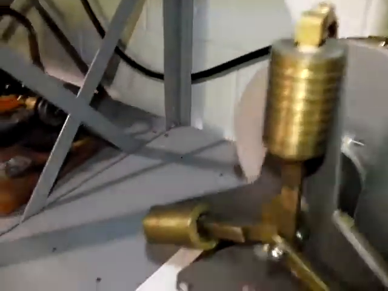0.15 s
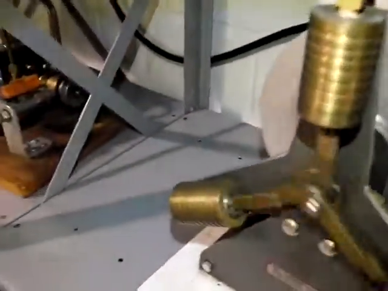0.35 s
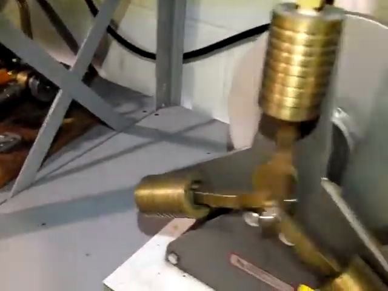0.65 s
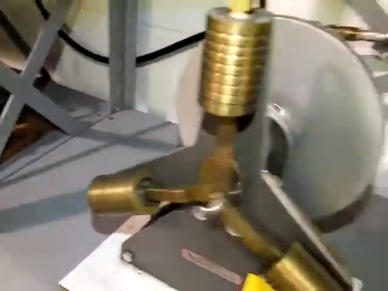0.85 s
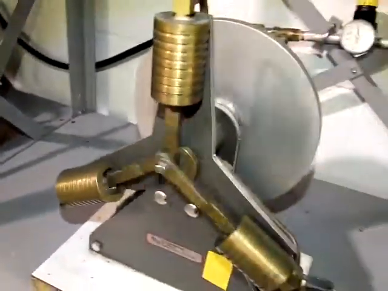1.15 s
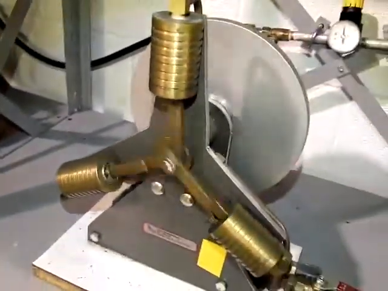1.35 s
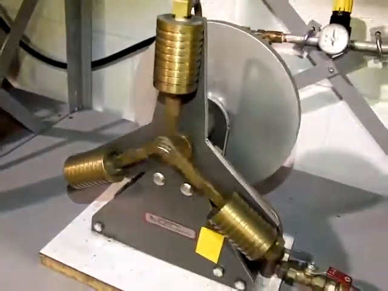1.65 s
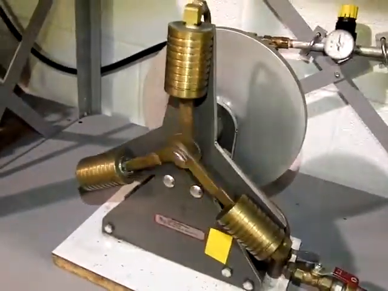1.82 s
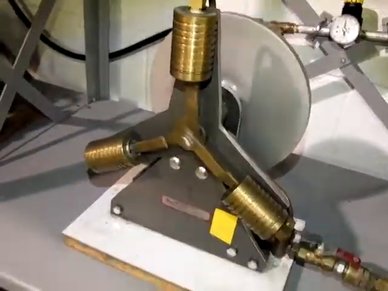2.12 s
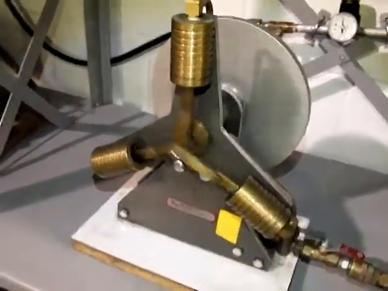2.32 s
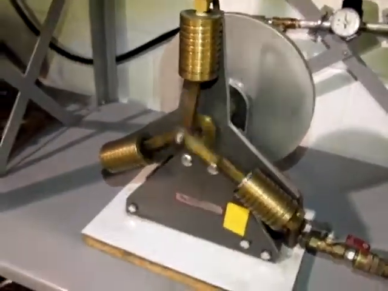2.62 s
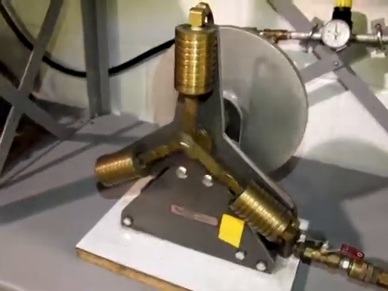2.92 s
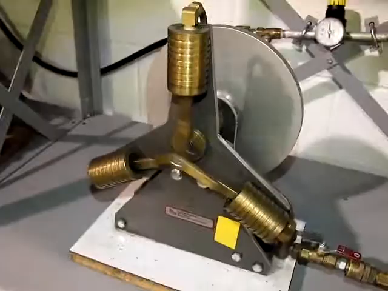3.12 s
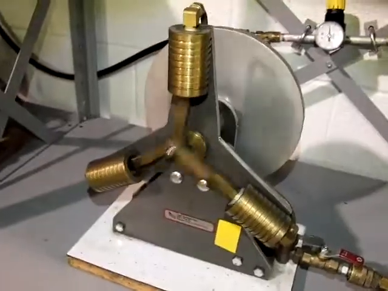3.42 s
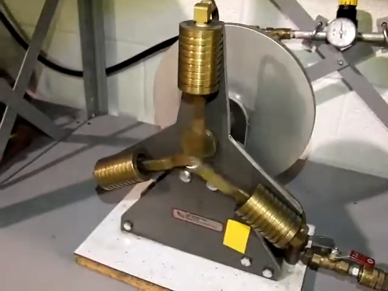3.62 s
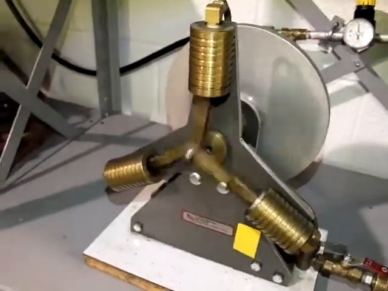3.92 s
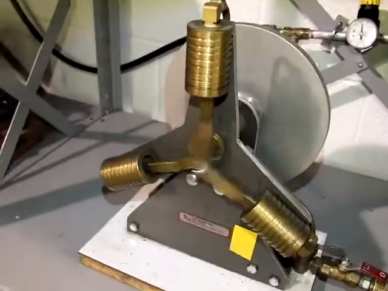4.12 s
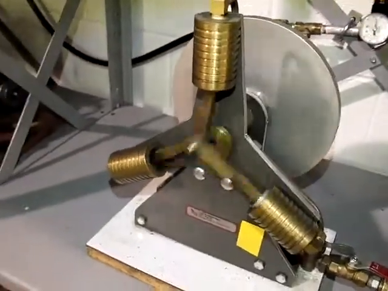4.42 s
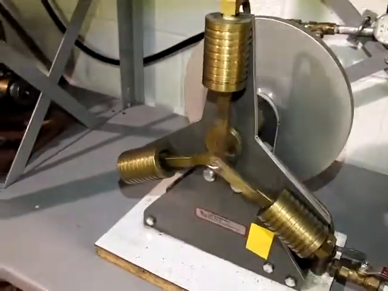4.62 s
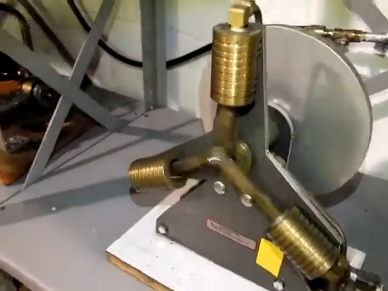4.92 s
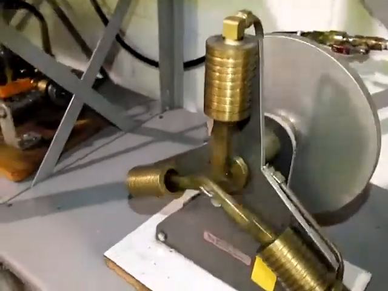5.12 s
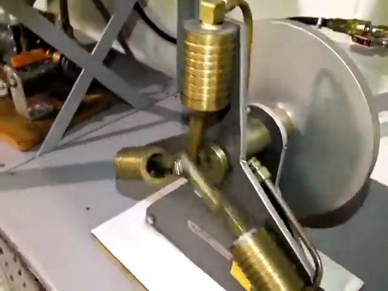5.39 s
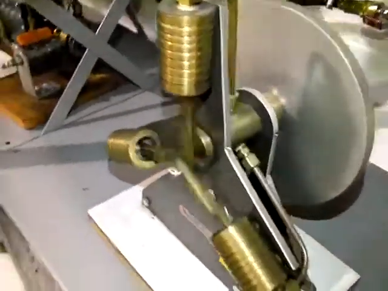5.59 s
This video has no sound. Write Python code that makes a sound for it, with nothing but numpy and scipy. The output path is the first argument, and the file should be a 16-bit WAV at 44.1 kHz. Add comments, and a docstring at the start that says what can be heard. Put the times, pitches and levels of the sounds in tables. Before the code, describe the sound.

A small three-cylinder brass engine running on compressed air is heard close by in a small, hard workshop. At 0 s a thin high metallic ping fades quickly, with soft low lurches and loose spurts of air. The first strong exhaust puff lands at about 0.23 s, led in by a swelling hiss; the next come at 0.5, 0.73 and 0.93 s. Each is a short, dry, mid-high bark with bright spray and a faint brass ring. By 2 s they run at about seven a second, settling near eight and staying even to the end at 5.75 s. Between puffs come a woody-metallic rod knock, light ticks and pulsing valve hiss. At 2.66 s a loose part clatters briefly. From about 2 s a low bench drone swells steadily, deepest and loudest at the end. A faint electrical hum lies beneath; short room reflections increase as the microphone retreats, and puffs sharpen again near the end.

```python
"""Brass air engine on a workbench

A three-cylinder engine speeds up from under three to eight turns a second, heard from close by.
One exhaust port barks once a turn (short tones and noise bursts) and rings the brass (fading sines).
Other valves hiss (noise), a rod bearing knocks and the valve gear taps (bursts through resonances).
With speed the bench drones (sines locked to the crank). A machine hums and a loose part clatters once.
"""
import sys
import numpy as np
from scipy import signal
from scipy.fft import rfft, irfft, next_fast_len
from scipy.io import wavfile
from scipy.ndimage import uniform_filter1d, map_coordinates

SR = 44100
rng = np.random.default_rng(int(sys.argv[2]) if len(sys.argv) > 2 else 0)


def master(y):
    """Save y as 16-bit WAV."""
    cut = np.clip(np.atleast_2d(y).T, -1, 1)
    pcm = np.round(cut * 32767)  # scale
    wavfile.write(sys.argv[1], SR, pcm.astype(np.int16))


N = 253575
TIME = np.arange(N) / SR
TOP_SPEED = 8.4315  # turns a second
CREST_S = .03  # every burst reaches its crest this long after its first sample


def crank(start_speed=2.4372, run_up_s=1.5354, start_turns=-.6686):
    """Steady air pressure brings the flywheel ever nearer its top speed; gives turns and share of top speed."""
    rate = TOP_SPEED - (TOP_SPEED - start_speed) * np.exp(-TIME / run_up_s)
    turns = start_turns + np.cumsum(rate) / SR  # the main exhaust opens at whole turns
    return turns, rate / TOP_SPEED


# puffs of the main exhaust; levels are before each layer's own trim:
# start_s (the crest), port_hz, chuff_db, fizz_db, passage_hz, rush_db
EXHAUST_PUFFS = [(0.2345, 1560, -23, -13, 4050, -16), (0.503, 1460, -23, -14.5, 4590, -16),
                 (0.7293, 1735, -21.5, -12.5, 4830, -15.5), (0.9307, 1460, -22.5, -17, 4700, -14.5),
                 (1.1177, 1500, -22, -19, 4020, -16.5), (1.2936, 1480, -22, -20.5, 3960, -18),
                 (1.4607, 1704, -25.5, -20.5, 3730, -17), (1.6221, 1590, -22.5, -21, 4000, -18),
                 (1.7764, 1880, -22.5, -19.5, 3700, -22), (1.9273, 1780, -22.5, -18, 3350, -19.5),
                 (2.0744, 1810, -30, -19.5, 4170, -18), (2.218, 1830, -21, -17.5, 4330, -18.5),
                 (2.3589, 1627, -21.5, -22, 4180, -22.5), (2.498, 1590, -22.5, -20.5, 3330, -21.5),
                 (2.635, 1770, -21.5, -20, 3440, -21.5), (2.7696, 1570, -22.5, -17.5, 3560, -19.5),
                 (2.904, 1467, -23.5, -22, 3420, -20.5), (3.035, 1570, -22.5, -20.5, 4280, -19),
                 (3.166, 1860, -25.5, -18.5, 3430, -20), (3.297, 1583, -22, -19.5, 3480, -20),
                 (3.4254, 1510, -21.5, -18.5, 3490, -19), (3.5531, 1500, -23, -19, 3500, -17.5),
                 (3.6804, 1530, -23, -17, 3380, -17.5), (3.807, 1516, -24, -17.5, 3340, -18.5),
                 (3.9325, 1556, -21, -18.5, 3470, -21.5), (4.0594, 1450, -20.5, -18.5, 3450, -18.5),
                 (4.1828, 1640, -27, -15.5, 3530, -20), (4.306, 1585, -21, -19.5, 3400, -18),
                 (4.4308, 1810, -25.5, -20.5, 3410, -18), (4.5545, 1830, -22, -16.5, 3460, -19.5),
                 (4.6764, 1520, -22, -17, 3350, -19.5), (4.7992, 1560, -24, -17.5, 3330, -19.5),
                 (4.9217, 1470, -23.5, -19.5, 3300, -19), (5.045, 1610, -27.5, -16.5, 4670, -18),
                 (5.1657, 1870, -39, -17, 3370, -19.5), (5.2864, 1640, -25, -16, 3290, -21),
                 (5.4081, 1510, -27.5, -18.5, 4510, -17.5), (5.53, 1460, -19.5, -16, 3480, -19),
                 (5.6502, 1550, -27, -16.5, 3430, -18)]
# colour of the rushing air: pitch_hz, level_db
RUSH_COLOUR = [(300, -17.5), (900, -21), (1700, -3), (2050, -3), (2500, 3), (3150, 1), (3850, 2.5),
               (4230, 3.5), (4450, 1), (4700, 5.5), (5400, -11.5), (6200, -11.5), (7300, -11), (9000, -52)]
# colour of the high hiss: pitch_hz, level_db
FIZZ_COLOUR = [(6000, -23), (7400, -20.5), (7950, -8), (8800, -13.5), (10000, -1.5), (10600, 6),
               (11400, 2.5), (12500, -9.5), (14200, -14), (15800, -26)]


def exhaust(speed, rise_s=0.0021, decay_s=0.0021, chuff_db=-0.64, ring_db=-39,
            passage_share=0.36, passage_lag_s=0.0035, linger=0.44):
    """Each release of air barks, hisses, whistles and rings the brass; a slow crank makes it last longer."""
    out = np.zeros((2, N))
    for s, port_hz, chuff, fizz, passage_hz, rush in EXHAUST_PUFFS:
        stretch = np.interp(s, TIME, speed) ** -linger
        up, down = rise_s * stretch, decay_s * stretch
        bark = whistle(port_hz, up * 0.58, down * 0.82, sag_per_s=34, breathy=.3, width_hz=1140)
        spray = burst(up * 0.95, down * 1.8, colour(FIZZ_COLOUR))
        rushing = burst(up * 1.13, down * 2.33, colour(RUSH_COLOUR))
        passage = whistle(passage_hz, up * 0.59, down * 0.35, sag_per_s=2.2, breathy=.35, width_hz=310)
        add(out, s, amp(chuff + chuff_db) * bark)
        add(out, s - .0012, amp(fizz) * spray)
        add(out, s + .0003, amp(rush) * np.sqrt(1 - passage_share) * rushing)
        add(out, s + passage_lag_s, amp(rush) * np.sqrt(passage_share) * passage)
        add(out, s, amp(ring_db) * brass_ring())
    return out


def whistle(hz, rise, decay, sag_per_s, breathy, width_hz):
    """A short tone that sags as the pressure drops; a share of its energy is breathy noise."""
    t = np.arange(SR // 8) / SR - CREST_S
    swell = np.exp(-.5 * (t / np.where(t < 0, rise, decay)) ** 2)
    cycles = hz * (t - .5 * sag_per_s * t * t)
    tone = swell * np.sin(2 * np.pi * (cycles + rng.random()))
    tone = unit(np.array([tone, 0 * tone])) * np.sqrt(.013 * SR / len(t))  # same energy as burst()
    breath = burst(2.1 * rise, 2.4 * decay, band(hz, width_hz, 2))
    return np.sqrt(1 - breathy) * tone + np.sqrt(breathy) * breath


# how the cylinder rings, before random changes of strength: pitch_hz, level_db, fade_s (to -60 dB)
BRASS_MODES = [(1348, 13, 0.056), (1481, 5, 0.11), (1674, -15, .08), (1910, 8, .1), (2210, 8, 0.079),
               (3440, 0, 0.11), (3570, 2, 0.1), (4170, 0, .1), (4700, -3, .08), (5250, 11, 0.13),
               (10600, -14, .06)]


def brass_ring(spread_db=6.0, attack_s=0.0013):
    """The brass cylinder's natural tones, each struck with a new strength by every puff."""
    t = np.maximum(np.arange(SR // 4) / SR - CREST_S, 0)
    ring = 0
    for hz, db, fade_s in BRASS_MODES:
        level = amp(db + spread_db * rng.standard_normal() - 60 * t / fade_s)
        ring = ring + level * np.sin(2 * np.pi * (hz * t + rng.random()))
    return np.array([ring * (1 - np.exp(-t / attack_s)), 0 * t])


# level of the hard edge, strongest at the start and near the end: start_s, level_db
EDGE_LEVEL = [(.2, -28.5), (1.5, -38), (4.4, -39.5), (5.6, -30)]


def edge(edge_hz=5250, width_hz=600, lag_s=0.000998):
    """Close to the port each puff has a hard, hissing edge, made of noise in a narrow band."""
    out = np.zeros((2, N))
    for s, *_ in EXHAUST_PUFFS:
        level = amp(np.interp(s, *np.transpose(EDGE_LEVEL)))
        add(out, s + lag_s, level * burst(0.0028, 0.0044, band(edge_hz, width_hz, 2)))
    return out


def after_fizz(trail_db=-10, lag_s=0.019, decay_s=0.015, bright_hz=12500):
    """Thin hiss trails each puff as the cylinder drains."""
    out = np.zeros((2, N))
    for s, _, _, fizz, _, _ in EXHAUST_PUFFS:
        add(out, s + lag_s, amp(fizz + trail_db) * burst(0.011, decay_s, band(bright_hz, 5000, 3)))
    return out


# resonances of the rod: pitch_hz, width_hz, level_db
ROD_MODES = [(528, 120, -4), (1405, 113, 5.5), (1525, 95, -6.5), (1910, 72, 9), (2000, 200, -5)]


def bearing(turns, speed, angle_turns=.395, scatter_turns=.011, lag_s=0.00383, knock_db=-33.5,
            slow_db=-13, spread_db=1.55, chatter_s=.007, seat_spread=0.016,
            rebound_db=-7, rebound_s=.014, scrape_db=-3):
    """Once a turn the rod crosses its play, knocks, chatters, scrapes and rebounds; softer when slow."""
    out = np.zeros((2, N))
    times = passes(turns, angle_turns) + lag_s  # the lag is the time to cross the play
    for s, (late, force, seat) in zip(times, rng.standard_normal((len(times), 3))):
        pace = np.interp(s, TIME, speed)
        s = s + scatter_turns * late / (pace * TOP_SPEED)
        db = knock_db + slow_db * (1 - pace) + spread_db * force
        # the way the rod seats shifts all its resonances together
        rod = lambda hz: body(ROD_MODES)(hz * np.exp(seat_spread * seat))
        add(out, s, amp(db) * burst(0.0016, 0.0024, rod))
        add(out, s + chatter_s, amp(db) * burst(0.003, 0.005, rod))
        add(out, s + rebound_s, amp(db + rebound_db) * burst(0.0021, 0.0074, rod))
        add(out, s + chatter_s, amp(db + scrape_db) * burst(0.004, 0.0042, band(1750, 1000, 2)))
    return out


# taps in every turn, at top speed and before scatter: angle_turns (after the main exhaust), level_db
GEAR_TAPS = [(.052, -43), (0.129, -44.5), (0.524, -42.5), (.845, -42)]
# resonances of the frame: pitch_hz, width_hz, level_db
FRAME_MODES = [(531, 65, -2), (672, 31, -4), (800, 34, -1.5)]


def taps(turns, speed, slow_db=-18, scatter_db=1.5):
    """The other rods and the valve gear tap the frame at set crank angles, more weakly at low speed."""
    out = np.zeros((2, N))
    for angle, db in GEAR_TAPS:
        for s in passes(turns, angle):
            pace = np.interp(s, TIME, speed)
            level = amp(db + slow_db * (1 - pace) + scatter_db * rng.standard_normal())
            add(out, s, level * burst(0.0006, 0.0014, body(FRAME_MODES)))
    return out


# leaks in every turn, before wander and speed: angle_turns (after the main exhaust), width_turns, level_db
VALVE_LEAKS = [(.16, 0.015, -24.5), (.29, 0.065, -30.5), (.485, .03, -36.5), (0.63, 0.022, -28),
               (.8, 0.067, -28.5), (.92, 0.045, -48)]
# colour of the valve leaks: pitch_hz, level_db
LEAK_COLOUR = [(900, -8), (1400, 9.5), (2400, 2.5), (3400, -1), (4500, 6), (5600, -11.5), (7000, -11),
               (9000, -9), (10000, 1), (10600, 10.5), (11500, 0), (12800, -12), (15500, -18)]
# colour of the escaping air: pitch_hz, level_db
AIR_COLOUR = [(700, -36), (1100, -22), (1450, 8), (1800, -4.5), (2400, 6.5), (3400, 3.5), (4600, -2.5),
              (5600, -19.5), (7300, -21), (9200, -13), (10500, 2.5), (12800, -21), (15500, -25)]
# steady noise, before trims: start_s, rolling_db, air_db
RUNNING_LEVELS = [(0, -49.5, -43.5), (.8, -49.5, -39.5), (1.4, -49.5, -41.5), (2.7, -47, -42),
                  (3.6, -42, -39.5), (4.8, -46, -40), (5.75, -41.5, -37.5)]


def leaks(turns, speed, valve_db=-1.7, air_db=2.95, wander_turns=0.0073, flutter_db=2.0,
          sputter_db=1.8, purge_db=5.5, purge_turns=0.14, thin_hz=2000):
    """Air slips past valves at similar angles each turn, over a hiss that swells as the piston empties."""
    angle_now = turns + wander_turns * wobble(10)
    opening = 0
    for angle, width, db in VALVE_LEAKS:
        offset = (angle_now - angle + .5) % 1 - .5
        opening = opening + amp(db) * np.exp(-.5 * (offset / width) ** 2)
    hiss = filtered(noise(LEAK_COLOUR), lambda hz: hz / np.hypot(hz, thin_hz))
    valves = amp(valve_db + 1.06 * wobble(7)) * speed ** 2 * opening * hiss
    purge = purge_db * np.cos(2 * np.pi * (turns - purge_turns))
    air_level = amp(curves(RUNNING_LEVELS)[1] + air_db + purge + flutter_db * wobble(32))
    return valves + air_level * patchy(noise(AIR_COLOUR), sputter_db)


def patchy(x, depth_db, smooth_hz=5000):
    """Turbulence makes each band of a noise swell and fade by itself, while the treble stays smoother."""
    hz, _, z = signal.stft(x, SR, nperseg=512)
    field = uniform_filter1d(rng.standard_normal(z.shape[1:]), size=8, axis=1)
    field = uniform_filter1d(field, size=4, axis=0)
    depth = depth_db / (1 + (hz[:, None] / smooth_hz) ** 2)
    return unit(signal.istft(z * amp(depth * unit(field)), nperseg=512)[1][:, :N])


# early spurts of air: start_s (the crest), decay_s, level_db
AIR_SPURTS = [(.056, 0.0075, -32), (0.122, 0.011, -24), (0.418, 0.0089, -25.5), (.655, 0.005, -29),
              (.865, 0.006, -31), (1.056, 0.0036, -42)]


def spurts():
    """A tighter cylinder spurts air while the crank is slow: bursts that weaken after the second."""
    out = np.zeros((2, N))
    for s, decay_s, db in AIR_SPURTS:
        add(out, s, amp(db) * burst(0.48 * decay_s, decay_s, colour(LEAK_COLOUR)))
    return out


def first_leak(crest_s=0.22, swell_s=0.05, fade_s=0.016, leak_db=-28, dull_hz=4500):
    """Air hisses out ahead of the first slow exhaust, until the pressure is released."""
    width_s = np.where(TIME < crest_s, swell_s, fade_s)
    swell = np.exp(-.5 * ((TIME - crest_s) / width_s) ** 2)
    hiss = filtered(noise(LEAK_COLOUR), lambda hz: dull_hz / np.hypot(hz, dull_hz))
    return amp(leak_db) * swell * hiss


# drone tones locked to the crank, strongest at 12 and 9 cycles a turn, before trims:
# cycles_per_turn, level_db
DRONE_TONES = [(5, -8), (7, 1), (8, -17), (9, 4), (11, -14), (12, 5.5), (13, -12.5), (15, -1.5), (16, -4),
               (17, -6.5), (19, -5), (20, -2.5), (22, -12), (26, 2), (38, -5), (40, -23)]
# how strongly the bench answers each pitch: pitch_hz, level_db
BENCH_ANSWER = [(40, -13), (62, -11), (71, -5), (77, -9.5), (88, -21), (95, -7), (100, 1), (110, -2),
                (120, -4), (130, -4), (150, -13), (260, -28), (312, -12.5), (340, -30)]
# resonances of the bench top: pitch_hz, width_hz, level_db
BOARD_MODES = [(40, 14, 1.5), (73, 17, 1), (99, 13, -0.5), (118, 9.4, 3.5), (256, 15, -12.5), (313, 20, -9)]
# colour of the bench rumble: pitch_hz, level_db
RUMBLE_COLOUR = [(15, -24), (25, -25), (38, -8.5), (55, -4), (72, 3.5), (100, 4.5), (130, -4), (180, -18),
                 (300, -6.5), (600, -33)]
# heaves of the slow crank: start_s (the middle), width_s, level_db
CRANK_LURCHES = [(.06, 0.11, -38.5), (0.421, 0.064, -37), (.68, 0.054, -42), (.85, .04, -39)]
# level of the bench's shaking, before trims: start_s, level_db
SHAKING_LEVEL = [(0, -52), (.7, -48.5), (1.4, -46), (2.4, -42), (3.3, -39.5), (4.5, -37.5), (5.75, -36.5)]


def bench(turns, speed, drone_db=-1.0, boom_share=0.52, drone_share=0.98):
    """The slow crank makes the bench lurch and boom; with speed a drone locked to the crank grows."""
    rate = TOP_SPEED * speed
    tones = 0
    for cycles, db in DRONE_TONES:
        level = amp(db + along(BENCH_ANSWER, cycles * rate) + 0.15 * wobble(3.2))
        tones = tones + level * np.sin(2 * np.pi * (round(cycles) * turns + rng.random()))
    boom = unit(filtered(rng.standard_normal((2, N)), body(BOARD_MODES)))
    rumble = np.sqrt(boom_share) * boom + np.sqrt(1 - boom_share) * noise(RUMBLE_COLOUR)
    lurch = sum(amp(db) * np.exp(-.5 * ((TIME - s) / width) ** 2) for s, width, db in CRANK_LURCHES)
    share = drone_share * speed ** 4
    shaking = amp(curves(SHAKING_LEVEL)[0])
    drone = shaking * amp(drone_db) * np.sqrt(share) * unit(tones)
    return drone + np.hypot(shaking * np.sqrt(1 - share), lurch) * rumble


# colour of the rubbing parts: pitch_hz, level_db
ROLLING_COLOUR = [(90, 2.5), (160, 5), (220, -2), (315, 1.5), (370, -4.5), (420, -4.5), (525, 3), (610, -6),
                  (668, 7.5), (735, -1), (798, 2.5), (950, -6), (1200, 1), (1600, -66), (2600, -70)]


def rolling(turns, rolling_db=1.74, throb_db=0.5):
    """Shaft and pistons rub as a low noise, hardest under each of the three power strokes in a turn."""
    load = np.cos(2 * np.pi * 3 * (turns - .13))
    level = amp(curves(RUNNING_LEVELS)[0] + rolling_db + throb_db * load)
    return level * noise(ROLLING_COLOUR)


# contacts of a loose part that drops and bounces, before a trim: start_s, level_db, centre_hz
LOOSE_CONTACTS = [(2.6622, -28, 1190), (2.6618, -21, 2420), (2.662, -29, 260), (2.667, -24.5, 557),
                  (2.6764, -23, 1050), (2.678, -22.5, 2200), (2.687, -31, 1900), (2.696, -34, 500)]
# resonances of the loose part: pitch_hz, width_hz, level_db
LOOSE_MODES = [(169, 79, -3.5), (322, 180, 0.5), (520, 130, 3.5), (1050, 230, -0.5), (1340, 84, -11),
               (1810, 180, -3), (2040, 160, 8.5), (2200, 130, 5), (2480, 150, 7.5), (3700, 2000, -2.5)]


def clatter(clatter_db=-2, focus_octaves=0.91):
    """A loose part drops and bounces, and each contact rings another region of its resonances."""
    out = np.zeros((2, N))
    for s, db, centre_hz in LOOSE_CONTACTS:
        focus = lambda hz: 1 / (1 + (np.log2((hz + 1) / centre_hz) / focus_octaves) ** 2)
        part = lambda hz: body(LOOSE_MODES)(hz) * focus(hz)
        add(out, s, amp(db + clatter_db) * burst(0.0004, 0.0024, part))
    return out


def ping(hz=3505, start_s=.019, fade_s=.24, ping_db=-27.0, after_db=-9):
    """A brass part pings at the start: a fading tone, then narrow noise that rings on unsteadily."""
    t = np.maximum(TIME - start_s, 0)
    tone = amp(-60 * t / fade_s) * np.sin(2 * np.pi * hz * t + 0.2 * wobble(41))
    ringing = unit(filtered(rng.standard_normal((2, N)), band(hz, 90, 2)))
    ringing = amp(after_db - 60 * t / .8) * ringing
    return amp(ping_db) * (1 - np.exp(-t / 0.0037)) * (tone + ringing)


def hum(hum_hz=360, hum_db=-48.5, low_hz=120, low_db=-57):
    """A mains-driven machine hums in the workshop: two steady pitches, the upper one wavering in level."""
    upper = amp(hum_db + 0.47 * wobble(2.4)) * np.sin(2 * np.pi * hum_hz * TIME)
    return upper + amp(low_db) * np.sin(2 * np.pi * low_hz * TIME)


# hard surfaces near the engine, before the sway: delay_s, gain (a plain factor)
NEAR_WALLS = [(.0023, 0.12), (.0052, 0.15), (.0087, .14)]


def walls(x, sway=0.0757):
    """Bench top, flywheel and wall add quick echoes; delays drift as the hand-held microphone sways."""
    out = x
    for delay_s, gain in NEAR_WALLS:
        heard = TIME - delay_s * (1 + sway * wobble(2))
        out = out + gain * np.array([np.interp(heard, TIME, channel) for channel in x])
    return out


# how long the room rings: pitch_hz, fade_s (to -60 dB)
ROOM_FADE = [(200, 0.15), (1500, 0.18), (4000, 0.17), (11000, 0.051), (16000, 0.58)]


def workshop(x, count=6):
    """The room answers with fading noise, blending through several answers as the microphone moves."""
    wet = np.zeros((2, N))
    for k in range(count):
        hz, t, z = signal.stft(rng.standard_normal((2, SR // 2)), SR, nperseg=256)
        fade = amp(-60 * t / along(ROOM_FADE, hz)[:, None]) * (1 - np.exp(-t / 0.00044))
        tail = signal.istft(z * fade, SR, nperseg=256)[1]
        here = np.maximum(1 - abs(np.linspace(0, count - 1, N) - k), 0)
        wet += signal.fftconvolve(x * here, tail / np.linalg.norm(tail[0]), axes=1)[:, :N]
    return wet


# likeness of the two microphone ports: pitch_hz, coherence (0 to 1)
PORT_LIKENESS = [(100, 1), (350, 0.72), (650, 1), (1050, 0.2), (1450, 0.36), (2200, 0.78), (3700, 0.62),
                 (5500, 0.65), (7200, 0.75), (8300, 0.76), (10500, 1), (14000, 0.72)]
# how far the left port leads: pitch_hz, lead_rad
PORT_LEAD = [(60, -.06), (350, -.45), (700, -.6), (1500, -1), (2000, -1.9), (3100, -3.2), (3480, -4.2),
             (3900, -3.2), (4500, -2.7), (16000, -2.9)]
# left level minus right level: pitch_hz, level_db
PORT_BALANCE = [(300, 0), (1050, 1), (1900, -1), (2400, -4.5), (3200, -4), (4200, 0), (8000, 0.5),
                (10300, -5), (11400, 0), (12500, 3.5), (15000, -1.5)]


def ports(pair):
    """Two microphone ports hear partly alike sound, with a phase lead and level balance set by pitch."""
    def shares(hz):
        spread = np.arccos(np.clip(along(PORT_LIKENESS, hz), 0, 1)) / 2
        return np.array([np.cos(spread), np.sin(spread)])

    def sides(hz):
        tilt = amp(along(PORT_BALANCE, hz) / 2) * np.exp(.5j * along(PORT_LEAD, hz))
        return np.array([tilt, 1 / tilt])

    common, apart = filtered(pair, shares)
    return filtered(np.array([common + apart, common - apart]), sides)


def amp(db):
    """Turns decibels into a gain."""
    return 10 ** (np.asarray(db) / 20)


def unit(x):
    """Scales x to an rms (average strength) of 1."""
    return x / np.sqrt(np.mean(x ** 2) + 1e-20)


def along(points, hz):
    """Reads a table of pitch_hz and value at any pitch, on a log axis."""
    f, v = np.transpose(points)
    return np.interp(np.log(hz + 1), np.log(f + 1), v)


def curves(rows):
    """Gives one value per sample for each column after the time."""
    s, *cols = np.transpose(rows)
    return [np.interp(TIME, s, c) for c in cols]


def wobble(rate):
    """A smooth random curve with this many random points a second."""
    return map_coordinates(rng.standard_normal(int(N * rate / SR) + 4), [TIME * rate])


def filtered(x, response):
    """Shapes x by a response that depends on frequency."""
    n = x.shape[-1]
    m = next_fast_len(n + n // 4)
    return irfft(rfft(x, m) * response(np.fft.rfftfreq(m, 1 / SR)), m)[..., :n]


def colour(points):
    """The response of a table of pitch_hz and level_db."""
    return lambda hz: amp(along(points, hz))


def body(modes):
    """The response of an object with a few resonances, added with alternating signs."""
    def response(f):
        total = 0
        for k, (c, w, db) in enumerate(modes):
            total = total + (-1) ** k * amp(db) * 1j * f * w / (c * c - f * f + 1j * f * w)
        return total
    return response


def band(hz, width_hz, power):
    """One resonance passed several times, which narrows it."""
    return lambda f: body([(hz, width_hz, 0)])(f) ** power


def noise(points):
    """Two unrelated coloured noises at rms 1."""
    return unit(filtered(rng.standard_normal((2, N)), colour(points)))


def burst(rise, decay, response):
    """Turbulence that swells and dies away, with the energy of 13 ms at rms 1."""
    t = np.arange(SR // 8) / SR - CREST_S
    swell = np.exp(-.5 * (np.minimum(t, 0) / rise) ** 2 - np.maximum(t, 0) / decay)
    x = filtered(swell * rng.standard_normal((2, len(t))), response)
    return unit(x) * np.sqrt(.013 * SR / len(t))


def add(track, s, sound):
    """Mixes a burst into the track with its crest at time s."""
    start = round((s - CREST_S) * SR)
    part = sound[:, max(-start, 0):N - start]
    track[:, max(start, 0):][:, :part.shape[1]] += part


def passes(turns, angle):
    """The times at which the crank passes an angle."""
    whole_turns = np.arange(np.ceil(turns[0] - angle), turns[-1] - angle)
    return np.interp(whole_turns + angle, turns, TIME)


def scene(near_wet_db=-15.5, far_wet_db=-7):
    """The engine in the room; the room grows louder as the microphone backs away in the first seconds."""
    turns, speed = crank()
    puffs = exhaust(speed) + edge() + after_fizz() + spurts()
    blows = walls(puffs + bearing(turns, speed)) + taps(turns, speed) + clatter() + ping()
    wet = amp(np.interp(TIME, [.5, 2.2], [near_wet_db, far_wet_db])) * workshop(blows)
    air = leaks(turns, speed) + first_leak()
    return ports(blows + wet + air + rolling(turns) + bench(turns, speed)) + hum()


# notches cut by the microphone ducts: pitch_hz, width_hz, depth (0 to 1)
DUCT_NOTCHES = [(2867, 460, 0.9), (4936, 82, 0.65)]


def record(dry, top_hz=15800):
    """The microphone ducts cut two notches, peaks clip at full scale and nothing passes above top_hz."""
    def ducts(f):
        return np.prod([1 - depth * body([(hz, width, 0)])(f) for hz, width, depth in DUCT_NOTCHES], axis=0)

    clipped = np.clip(filtered(dry, ducts), -1, 1)
    return filtered(clipped, lambda hz: hz < top_hz)


dry = scene()
out = record(dry)
master(out)
```